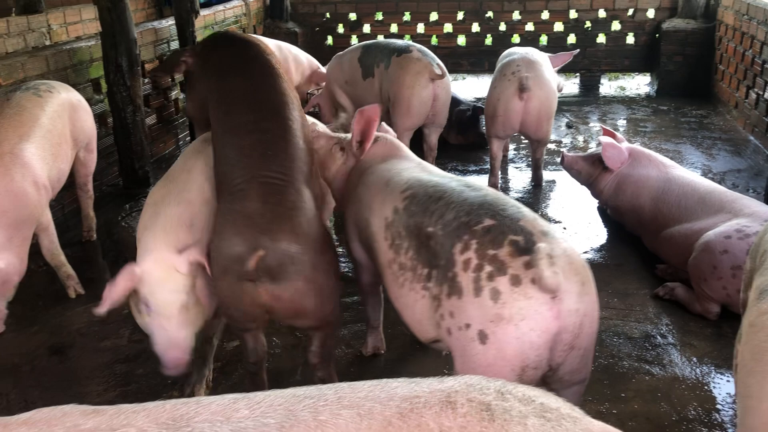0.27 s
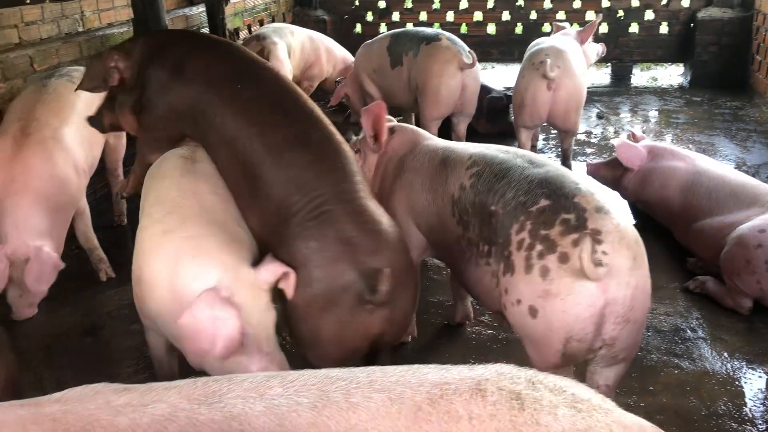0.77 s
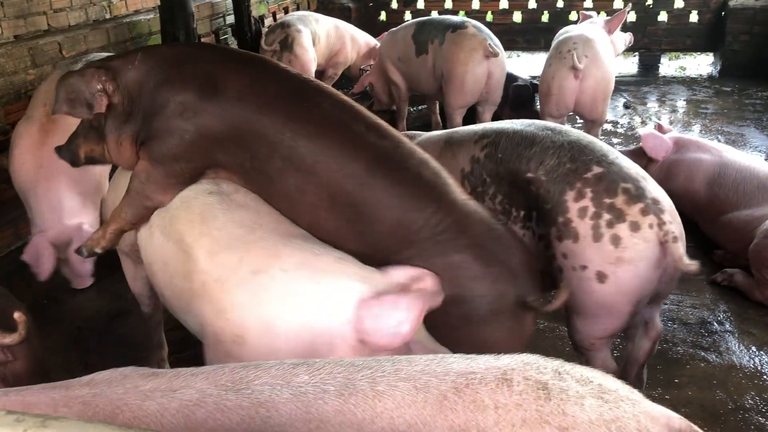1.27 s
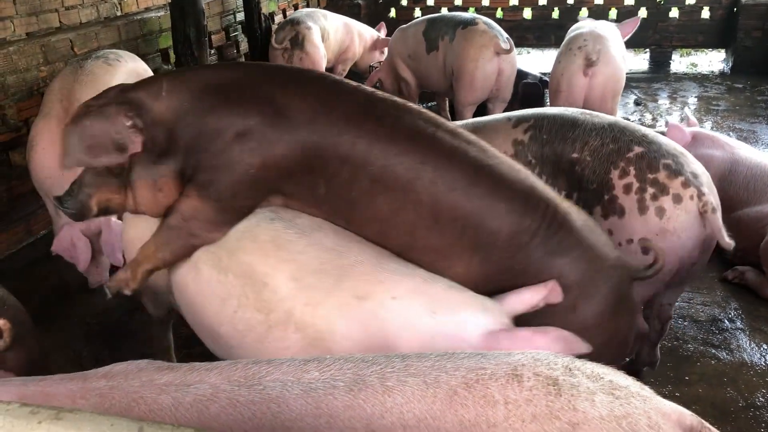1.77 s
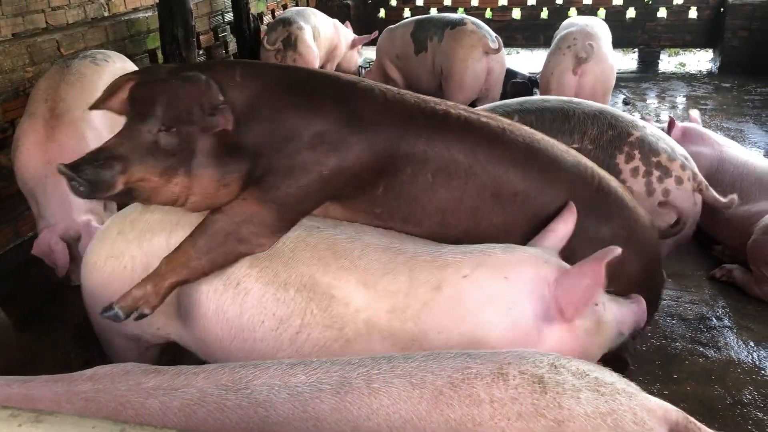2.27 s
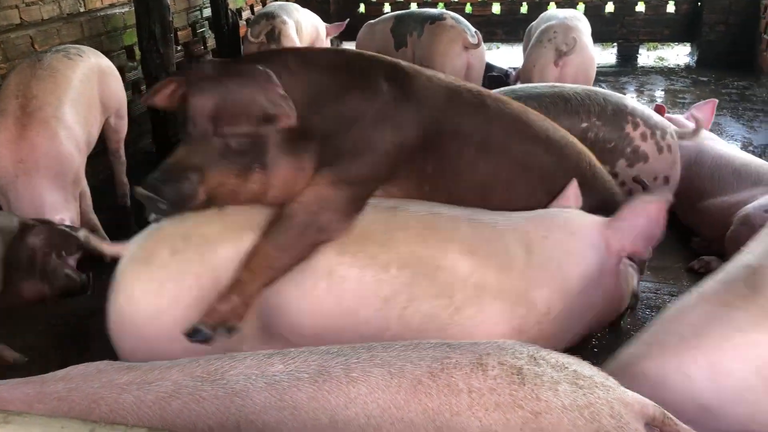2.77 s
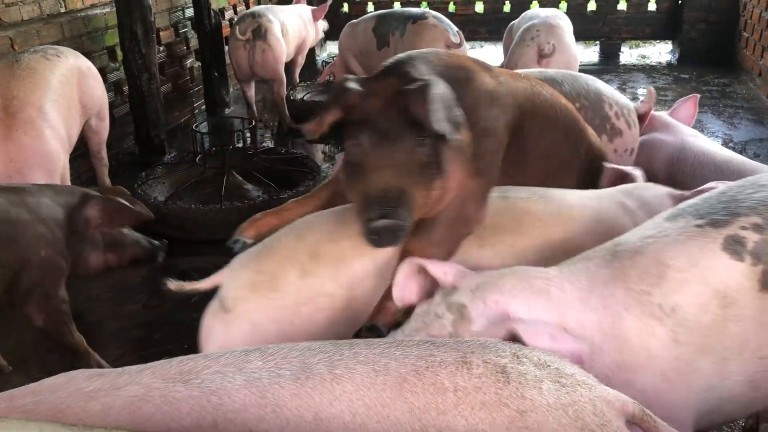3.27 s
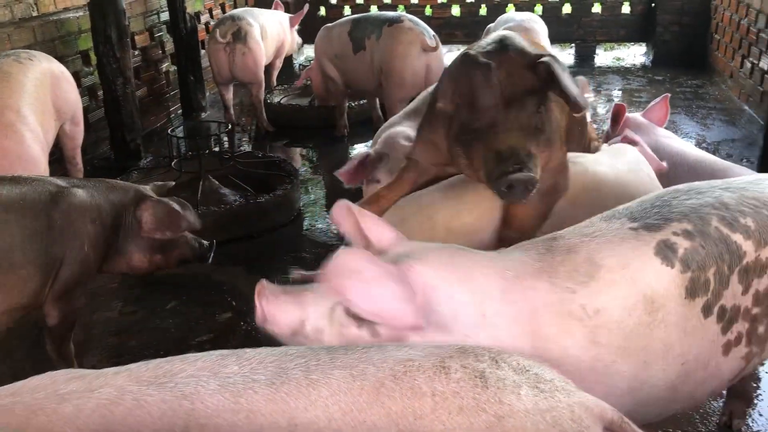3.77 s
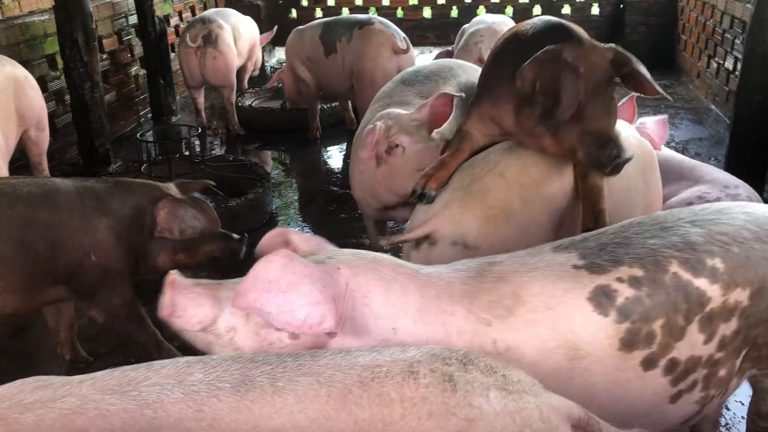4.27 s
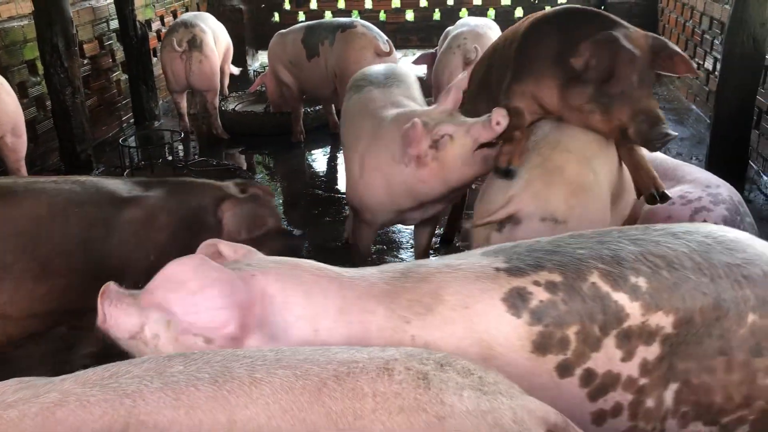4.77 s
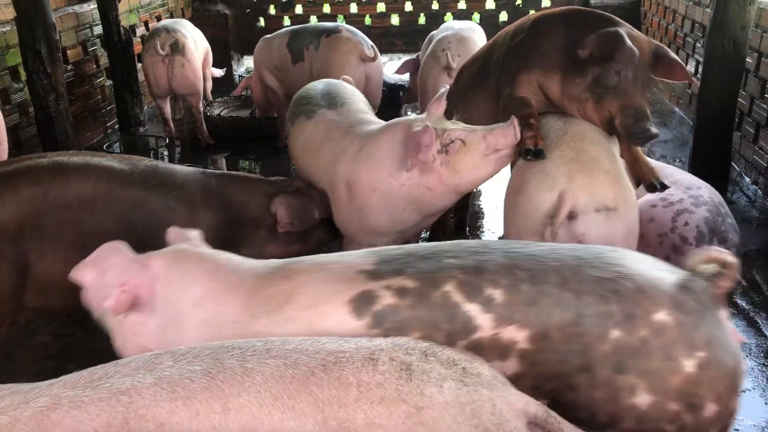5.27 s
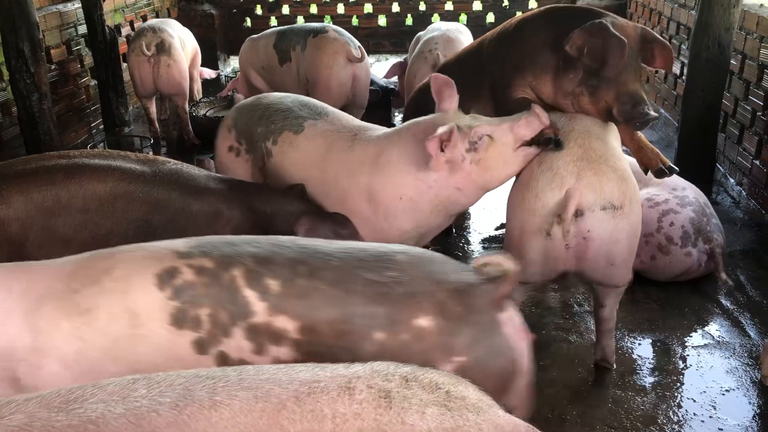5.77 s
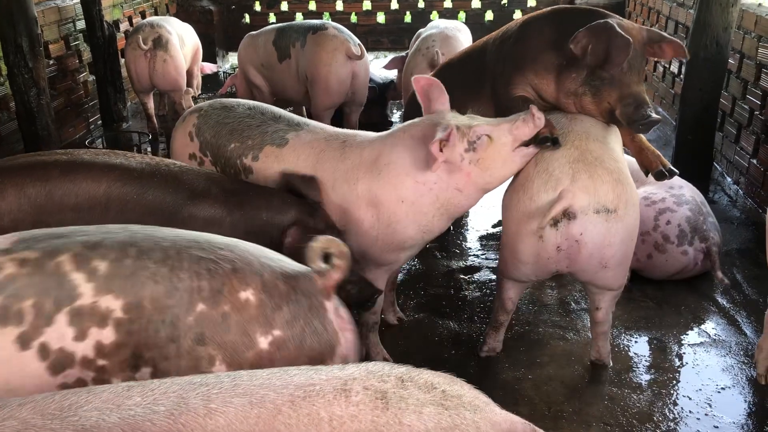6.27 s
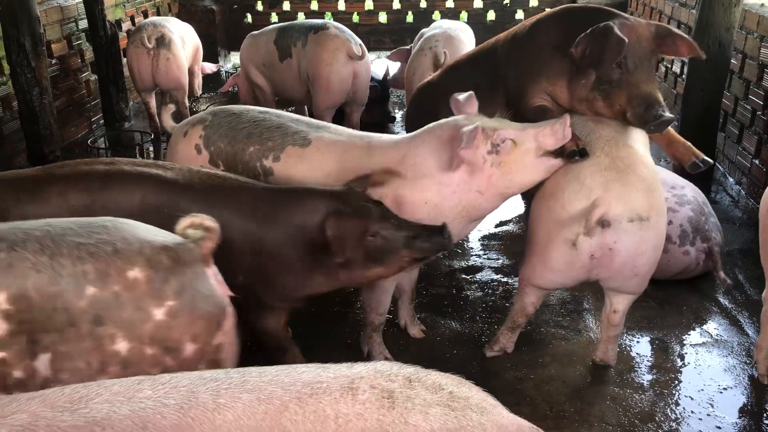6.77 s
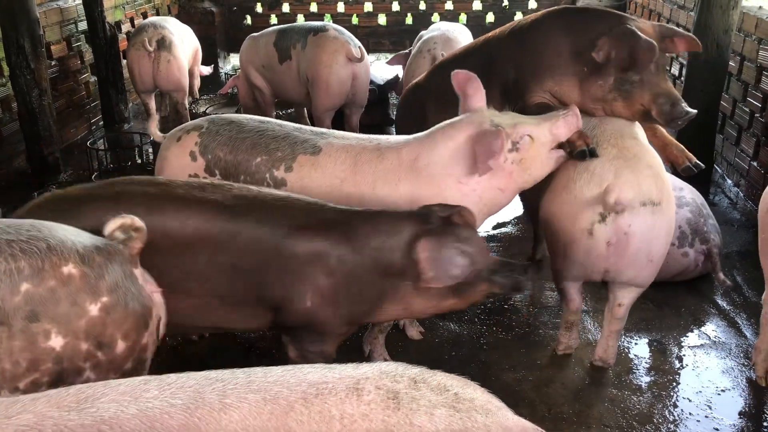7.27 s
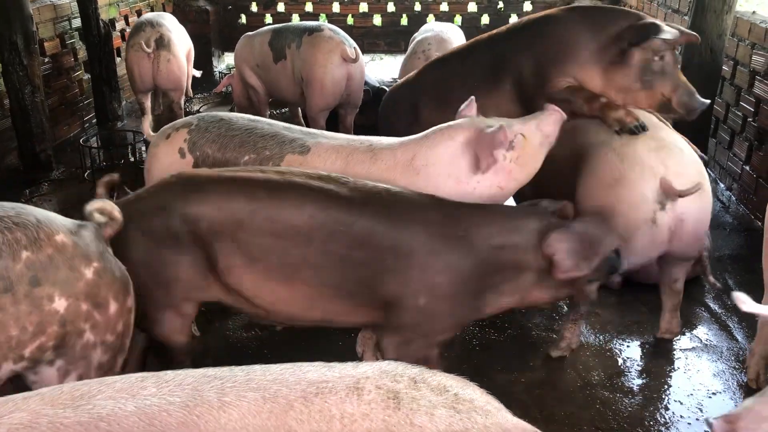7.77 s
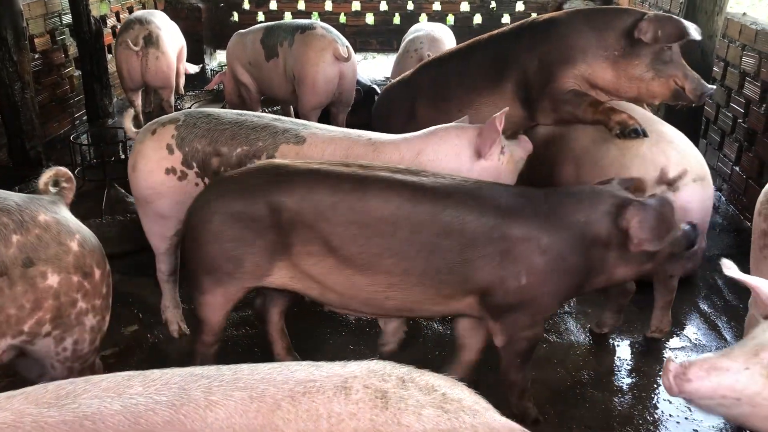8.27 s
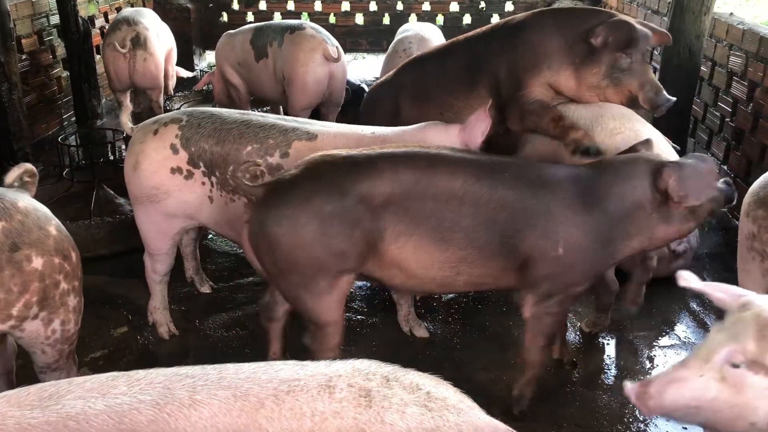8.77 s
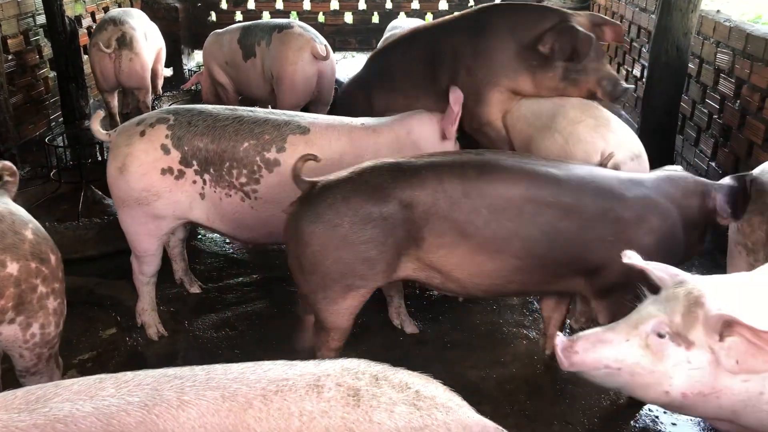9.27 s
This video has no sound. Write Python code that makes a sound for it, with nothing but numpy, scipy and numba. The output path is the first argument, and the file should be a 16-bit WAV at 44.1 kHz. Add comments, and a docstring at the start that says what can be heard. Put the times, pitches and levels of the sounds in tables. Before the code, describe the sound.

Pigs grunt in short, throaty rattling bursts with one harsh early squeal, in an echoing brick pen over hissing water and low herd rumble.

```python
"""Grunting, squealing and snorting pigs jostle close to a phone in a wet brick pen, over water hiss and a far rumble.
A grunt is a short train of slow throat flaps, each a click and a puff of air that ring chest, throat, mouth and
snout. Two squeals are rasping random slaps and air in a gliding mouth; a few snorts are noise through the nostrils.
Water sprays on the floor, the distant herd rumbles, and the walls echo the near voices. Both channels are alike."""
import sys
import numpy as np
from scipy import signal
from scipy.io import wavfile
from scipy.ndimage import uniform_filter1d
from numba import njit

SR = 44100
rng = np.random.default_rng(int(sys.argv[2]) if len(sys.argv) > 2 else 0)


def master_out(mix):
    """Clip the mix to full scale and print it as 16-bit PCM to the path in sys.argv[1]."""
    frames = np.transpose(np.atleast_2d(mix))
    ceiling = np.clip(frames, -1, 1)
    pcm = np.round(ceiling * 32767).astype(np.int16)
    wavfile.write(sys.argv[1], SR, pcm)


N = 420273  # samples

# Far herd, spectrum before its overall level: (frequency [Hz], density [dB per Hz])
HERD_COLOUR = [(15, -41), (25, 0.5), (106, 2), (409, -4.5), (556, -0.5), (918, -8.5), (1320, -14),
               (1670, -22.5), (2500, -12), (3250, -10.5), (5500, -120)]
HERD_DB = -42.5  # rms before the swell
HERD_SWELL = 0.72  # dB of swell per dB of splash excess

# Water hiss as a whole: (time [s], level [dB])
SPRAY_LEVELS = [(0.0, -43.5), (0.1, -40), (0.34, -40), (0.6, -31.5), (0.68, -39), (1.25, -36.5),
                (1.33, -46), (1.4, -41), (1.96, -41.5), (2.04, -37.5), (2.2, -39.5), (2.25, -43.5),
                (2.39, -41.5), (2.49, -38.5), (2.94, -40.5), (3.29, -49.5), (3.34, -35.5), (3.45, -37.5),
                (3.53, -46), (3.61, -42.5), (4.01, -38.5), (4.17, -43.5), (4.25, -40), (4.8, -40.5),
                (4.86, -46), (4.96, -34.5), (5.07, -44), (5.2, -39.5), (5.36, -40), (5.6, -37), (5.73, -41),
                (5.79, -33.5), (5.89, -41), (6.01, -32), (6.1, -42.5), (6.16, -36.5), (6.48, -38.5),
                (6.69, -44.5), (6.79, -39), (7.72, -39), (7.86, -45.5), (7.99, -39), (8.28, -38.5),
                (8.33, -37.5), (8.44, -43.5), (8.63, -37), (8.73, -41.5), (8.81, -35), (8.97, -42.5),
                (9.08, -38), (9.16, -40.5), (9.53, -37)]
# Lower bands of the hiss, before the splash gain: (time [s], level [dB])
SPLASH_LEVELS = [(0.0, -47.5), (0.32, -39), (0.79, -37), (1.3, -43.5), (1.6, -50), (2.87, -53.5),
                 (3.5, -46), (3.7, -54), (4.83, -54.5), (5.5, -46.5), (5.65, -33.5), (5.81, -53),
                 (6.95, -51.5), (7.48, -42.5), (7.96, -57), (9.53, -51.5)]
# Water spectrum before its overall level: (frequency [Hz], density [dB per Hz])
SPRAY_COLOUR = [(530, -10), (900, -19), (1040, -11), (1140, 4), (1370, 1.5), (1760, -14.5), (2230, -4),
                (12200, 7), (15700, 4)]
SPLASH_HZ, SPLASH_GAIN_DB = 3060, 16  # the splash gain is halved in dB at this frequency
SPRAY_FLICKER_DB, SPRAY_FLICKER_HZ = 0.5, 16

# Wall echo in a low and a high band: (top [Hz], 60 dB decay time [s], echo level [dB])
ECHO_BANDS = [(1520, 0.32, 1.5), (11800, 0.42, -3)]

# Snorts, level before the swell: (time [s], length [s], rise [share of length], level [dB],
# start centre [Hz], end centre [Hz], width [Hz])
SNORTS = [(1.44, 0.13, 0.14, -49, 1900, 1910, 250), (5.944, 0.2, 0.28, -40.5, 815, 866, 2740),
          (6.284, 0.058, .3, -75, 1310, 1300, 200), (6.83, 0.13, .3, -47.5, 2270, 2100, 300),
          (8.288, .07, .1, -47, 2200, 2100, 400), (8.657, 0.12, 0.02, -46, 2950, 2620, 1300)]

# Loudness curve of each squeal: (time [s], level [dB])
SQUEAL_LEVELS = [
    [(.34, -37), (.39, -22.5), (.44, -20), (.52, -19.5), (.6, -22), (.645, -20.5), (.665, -32), (.7, -21)],
    [(2.82, -32), (2.85, -32), (2.885, -28.5), (2.92, -44), (2.97, -46), (3.04, -43), (3.09, -54)],
]
# Mouth resonances of each squeal: (start centre [Hz], end centre [Hz], width [Hz], relative level [dB])
SQUEAL_MOUTHS = [
    [(810, 626, 156, 6), (1550, 2400, 530, 5), (2220, 3100, 360, 5), (3460, 4400, 480, 3),
     (4030, 4800, 300, 2), (5300, 6000, 1000, -10), (7900, 9240, 2000, -10), (10900, 12000, 2500, -31)],
    [(630, 820, 280, 0.5), (1860, 1600, 160, -9), (2700, 2600, 190, -15), (4180, 3800, 600, -18)],
]
SQUEAL_RATE_HZ = 540  # average number of slaps a second

# Grunts, flap levels before the common gain, cavity levels counted from the mouth:
# (first flap [s], last flap [s], flaps [count], first flap [dB], middle flap [dB], last flap [dB],
# chest [dB], throat [Hz], throat [dB], mouth start [Hz], mouth end [Hz], palate [dB], snout [dB])
GRUNTS = [(.053, .132, 4, -31, -9, -26.5, -20, 302, -5.5, 705, 706, -11, -19.5),
          (.232, 0.342, 5, -20.5, -18.5, -28, -14.5, 357, -4, 730, 753, -9, -12.5),
          (.374, 0.491, 5, -19.5, -20, -42, -22, 378, -7, 700, 796, -12, -18),
          (0.698, 0.757, 3, -21.5, -19.5, -27, -21, 380, -3, 735, 797, -5, -11.5),
          (.962, 1.051, 4, -18.5, -13.5, -33, -16, 372, 0.5, 770, 710, -3.5, -15),
          (1.136, 1.203, 3, -18, -25.5, -21.5, -18, 370, -2, 780, 714, -7, -11.5),
          (1.231, 1.338, 5, -20, -19, -38, -13.5, 422, 0.5, 797, 820, -6, -13),
          (1.662, 1.715, 3, -22.5, -26.5, -19.5, -12.5, 332, -3.5, 660, 806, -5.5, -8.5),
          (1.84, 1.901, 3, -24, -17.5, -20, -17, 488, -3, 790, 800, -11.5, -13),
          (2.189, 2.226, 2, -25, -46, -22.5, -13, 394, -8, 720, 618, -5, -16.5),
          (2.419, 2.49, 3, -53, -31, -38.5, -4, 340, -15, 756, 507, -5.5, -15.5),
          (2.696, 2.767, 3, -35.5, -36.5, -60, -2, 303, -10.5, 660, 770, -10, -26),
          (3.092, 3.171, 3, -34, -43, -71, -2, 270, -54, 754, 715, -11, -15.5),
          (3.265, 3.375, 4, -39.5, -38.5, -60, -4, 240, -14, 656, 1090, -11, -15.5),
          (3.439, 3.556, 4, -45.5, -47, -51.5, 2, 298, -6, 915, 770, -7, -6.5),
          (3.583, 3.653, 3, -28, -27, -41, -17, 404, -4, 748, 910, -5, -18),
          (4.114, 4.194, 3, -55.5, -56, -48, 8, 274, 3, 600, 790, 2, 2),
          (4.211, 4.265, 3, -27, -28, -38, -11, 406, 2.5, 994, 626, -9.5, -9),
          (4.392, 4.45, 3, -39.5, -45, -81, -1.5, 356, .5, 657, 630, -18, -22),
          (4.713, 4.77, 3, -26, -22.5, -31, -13, 535, 1, 860, 755, -11, -10.5),
          (4.999, 5.054, 3, -30.5, -30, -35.5, -4.5, 492, -0.5, 746, 980, -12, -9.5),
          (5.34, 5.43, 4, -87, -44, -56, -8, 333, 6, 415, 970, -29, -60),
          (5.644, 5.701, 3, -32.5, -33, -38, -10, 415, 0.5, 810, 800, -15, -30),
          (6.423, 6.535, 5, -45, -35.5, -44, -3.5, 287, -11, 486, 520, -7.5, -35),
          (6.616, 6.716, 4, -47, -32.5, -39, -4.5, 330, -11.5, 570, 680, -7.5, -25),
          (6.826, 6.935, 4, -49, -55, -52, 0, 205, 2, 560, 360, 0, -13),
          (7, 7.094, 4, -32.5, -34, -51, -9, 286, -17, 570, 580, -10.5, -16),
          (7.387, 7.46, 4, -25.5, -36.5, -38.5, -12, 327, -10.5, 635, 600, -21, -30),
          (7.784, 7.931, 5, -70, -62, -66, -31, 169, 14, 483, 930, 7.5, -15),
          (7.986, 8.047, 3, -28.5, -28.5, -36, -12, 352, -8.5, 615, 465, -14, -23),
          (8.077, 8.249, 7, -43, -43.5, -49, -2.5, 342, -2.5, 527, 477, -14, -23),
          (8.291, 8.402, 4, -36.5, -37.5, -59, -9, 280, -13.5, 526, 517, -11, -23),
          (8.439, 8.61, 6, -38.5, -36, -50, -10, 424, -20, 610, 662, -24, -28),
          (8.866, 9.028, 6, -42.5, -32, -49.5, -17, 274, -9, 483, 570, -18, -29),
          (9.068, 9.235, 6, -42, -42, -60, -5, 270, -12.5, 515, 554, -31, -23),
          (9.465, 9.524, 3, -38, -32.5, -39, -10, 252, -3.5, 566, 630, -9.5, -23)]
# Cavity bandwidths for chest, throat, mouth, palate, nose, snout, nostril: (width [Hz])
CAVITY_WIDTHS = [99, 140, 142.5, 195, 251, 546, 620]
GRUNT_GAIN_DB = 24.5
PUFF_S, BREATH_S, CLICK_DB = 0.009, 0.035, 15.5  # decay times of puff and breath; click against puff
FLAP_JITTER_S, FLAP_SPREAD_DB = 0.0008, 1.0  # standard deviations
CHEST_HZ, SNOUT_HZ = 95, 3250
NOSTRIL_HZ, NOSTRIL_DB = 4440, -26  # level against the snout
PALATE_HZ, PALATE_SAG_HZ_PER_DB = 1435, 7.5  # the palate sinks in softer grunts
NOSE_HZ, NOSE_SLOPE = 2486, 0.95  # Hz that the nose falls per Hz of mouth
# a softer grunt is more nasal and breathy: dB at the loud level, then dB gained per dB softer
LOUD_DB, NOSE_DB, NOSE_GROWTH, BREATH_DB, BREATH_GROWTH = -16.5, -27.5, 0.55, -20.5, 0.48
LEAK_HZ, LEAK_WIDTH_HZ, LEAK_DB = 594, 1220, -16
CRACK_HZ, CRACK_DB = 4460, -36

BASS_CUT_HZ, TOP_HZ = 59.6, 15750  # pass band of the phone


def undb(db):
    """Gain of a level in dB."""
    return 10 ** (np.asarray(db) / 20)


def level(x, db):
    """Scale a sound to an rms level in dB."""
    return x * undb(db) / np.sqrt(np.mean(x ** 2))


@njit
def svf(x, hz, width):
    """State-variable band-pass with a moving centre and a gain of 1 there."""
    y, band, low = np.empty(len(x)), 0., 0.
    for i in range(len(x)):
        g, damping = np.tan(np.pi * hz[i] / SR), width / hz[i]
        v = (band + g * (x[i] - low)) / (1 + g * (g + damping))
        band, low = 2 * v - band, low + 2 * g * v
        y[i] = damping * v
    return y


def cavity(x, hz, width):
    """A steep resonance: the band-pass twice."""
    centre = hz * np.ones(len(x))
    once = svf(x, centre, 1. * width)
    return svf(once, centre, 1. * width)


def walk(rate):
    """Random levels held 1 / rate seconds and smoothed twice; their spread is near 1."""
    hold = int(SR / rate)
    steps = np.repeat(rng.standard_normal(N // 100), hold)[:N]
    return 1.62 * uniform_filter1d(uniform_filter1d(steps, hold), hold)


def wash(colour, gain_db):
    """Third-octave bands of unrelated noise; gain_db(hz) moves each band in time."""
    hzs, dbs = np.transpose(colour)
    octaves = np.arange(0, np.log2(hzs[-1] / hzs[0]), 1 / 3)
    out = 0
    for hz in hzs[0] * 2 ** octaves:
        band = cavity(rng.standard_normal(N), hz, hz / 1.59)
        band_db = np.interp(np.log(hz), np.log(hzs), dbs)
        out = out + undb(band_db + gain_db(hz)) * band
    return out


def herd(splash_excess_db):
    """Far pigs and feet as low noise that throbs at random and swells with the lower bands of the water."""
    throb = 2.0 * walk(30)  # shared by all bands
    rumble = wash(HERD_COLOUR, lambda hz: throb + 2.0 * walk(6.5))
    swell_db = HERD_SWELL * (splash_excess_db - np.mean(splash_excess_db))
    return level(rumble, HERD_DB) * undb(swell_db)


def spray():
    """Water as swelling noise whose bands flicker alone; also returns the excess of its lower bands in dB."""
    t = np.arange(N) / SR
    spray_db = np.interp(t, *np.transpose(SPRAY_LEVELS))
    splash_excess_db = np.interp(t, *np.transpose(SPLASH_LEVELS)) - spray_db + SPLASH_GAIN_DB

    def band_gain_db(hz):
        """The lower bands follow the splash; every band flickers at random."""
        return splash_excess_db / (1 + (hz / SPLASH_HZ) ** 2) + 2.17 * walk(18)

    hiss = level(wash(SPRAY_COLOUR, band_gain_db), 0.5)
    flicker_db = SPRAY_FLICKER_DB * walk(SPRAY_FLICKER_HZ)
    return hiss * undb(spray_db + flicker_db), splash_excess_db


def pen(x):
    """Direct sound plus a dense echo of the brick walls, noise that decays at its own rate in each band."""
    t = np.arange(int(.6 * SR)) / SR
    noise, echo, below = rng.standard_normal(len(t)), 0, 0
    for top_hz, t60, db in ECHO_BANDS:
        low = signal.sosfilt(signal.butter(2, top_hz, fs=SR, output="sos"), noise)
        onset = np.clip(t / 0.0015, 0, 1)
        tail = (low - below) * np.exp(-np.log(1000) * t / t60) * onset
        # unit energy for a flat band, then the echo level
        unit = np.sqrt(2 * np.log(1000) / t60 / SR)
        echo = echo + undb(db) * tail * unit
        below = low
    return x + signal.fftconvolve(x, echo)[:N]


def snorts():
    """Plain air through the nostrils: band-passed noise that swells and dies away."""
    out, air = np.zeros(N), rng.standard_normal(N)
    for start, long, rise, db, hz, end_hz, width in SNORTS:
        i, n = int(start * SR), int(long * SR)
        blow = np.interp(np.arange(n) / n, [0, rise, 1], [0, 1.6, 0])
        hiss = cavity(air[i:i + n], np.linspace(hz, end_hz, n), width)
        out[i:i + n] = level(hiss, db) * blow
    return out


def squeals():
    """Fast, chaotic fold slaps and air through a mouth whose resonances glide as it opens."""
    out = np.zeros(N)
    for curve, mouth in zip(SQUEAL_LEVELS, SQUEAL_MOUTHS):
        times, dbs = np.transpose(curve)
        t = np.arange(times[0], times[-1], 1 / SR)
        n = len(t)
        slaps = (rng.random(n) < SQUEAL_RATE_HZ / SR) * rng.standard_normal(n)
        drive = level(slaps, 0.26) + rng.standard_normal(n)
        voice = 0
        for hz, end_hz, width, db in mouth:
            # each resonance wobbles in strength and place as the tongue trembles
            gain = undb(db + 3.0 * walk(46.2)[:n])
            centre = np.linspace(hz, end_hz, n) * (1 + 0.011 * walk(29.7)[:n])
            voice = voice + gain * cavity(drive, centre, width)
        loudness = undb(np.interp(t, times, dbs)) * signal.windows.tukey(n, .1)
        i = int(times[0] * SR)
        out[i:i + n] = level(voice, 0) * loudness
    return out


def grunts():
    """Each flap clicks, puffs and leaks some breath into the cavities; the mouth glides as the jaw moves."""
    out, air = np.zeros(N + SR), rng.standard_normal(N + SR)
    luck = rng.standard_normal((len(GRUNTS), 2, 12))
    for grunt, (late, size) in zip(GRUNTS, luck):
        (start, end, flaps, first, middle, last, chest_db, throat_hz, throat_db,
         mouth_hz, mouth_end_hz, palate_db, snout_db) = grunt
        long = end - start
        softer = LOUD_DB - max(first, middle)
        nose_db = NOSE_DB + NOSE_GROWTH * softer
        breath_db = BREATH_DB + BREATH_GROWTH * softer

        t = np.arange(int((long + 0.11) * SR)) / SR
        at = np.linspace(0, long, flaps)
        flap_db = np.interp(at, [0, long / 2, long], [first, middle, last])
        gains = undb(flap_db + FLAP_SPREAD_DB * size[:flaps])
        # every flap but the first is a little early or late
        flap_times = at + FLAP_JITTER_S * late[:flaps] * (at > 0)
        since = t - flap_times[:, None]
        decay = np.exp(-np.abs(since) / PUFF_S) + undb(breath_db) * np.exp(-np.abs(since) / BREATH_S)
        puff = gains @ ((since >= 0) * decay)
        # the flap snaps open with a click of one sample
        click = undb(CLICK_DB) * gains @ ((since >= 0) & (since < 1 / SR))
        i = int(start * SR)
        drive = puff * air[i:i + len(t)] + click

        mouth = np.interp(t, [0, long + 0.025], [mouth_hz, mouth_end_hz])
        palate_hz = PALATE_HZ - PALATE_SAG_HZ_PER_DB * softer
        # a more closed, lower mouth goes with a higher nose resonance
        nose_hz = NOSE_HZ - NOSE_SLOPE * mouth
        hzs = [CHEST_HZ, throat_hz, mouth, palate_hz, nose_hz, SNOUT_HZ, NOSTRIL_HZ]
        dbs = [chest_db, throat_db, 0, palate_db, nose_db, snout_db, snout_db + NOSTRIL_DB]
        voice = 0
        for k, (hz, db, width) in enumerate(zip(hzs, dbs, CAVITY_WIDTHS)):
            polarity = (-1) ** k  # neighbouring cavities alternate
            voice = voice + polarity * undb(db) * cavity(drive, hz, width)
        # sound through the cheeks fills the low valleys; the bare flap adds a bright crack
        voice += undb(LEAK_DB) * cavity(drive, LEAK_HZ, LEAK_WIDTH_HZ)
        voice += undb(CRACK_DB) * cavity(drive, CRACK_HZ, CRACK_HZ)
        out[i:i + len(t)] += voice
    return undb(GRUNT_GAIN_DB) * out[:N]


def scene():
    """Near voices echo in the pen over dry water and herd; one microphone feeds both channels."""
    water, splash_excess_db = spray()
    voices = grunts() + squeals() + snorts()
    mono = pen(voices) + water + herd(splash_excess_db)
    return np.array([mono, mono])


def record(dry):
    """The phone drops the deepest bass and cuts the top steeply."""
    thin = signal.sosfilt(signal.butter(3, BASS_CUT_HZ, "high", fs=SR, output="sos"), dry)
    return signal.sosfilt(signal.ellip(10, .2, 80, TOP_HZ, fs=SR, output="sos"), thin)


dry = scene()
out = record(dry)
master_out(out)
```